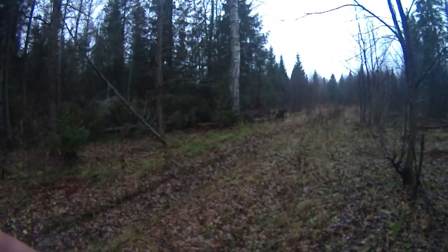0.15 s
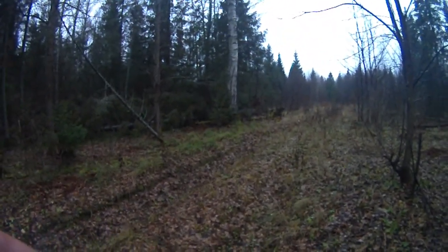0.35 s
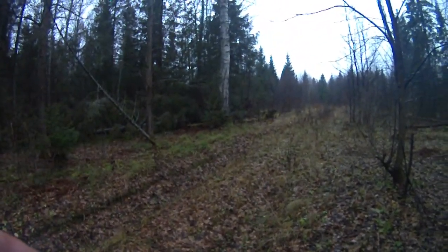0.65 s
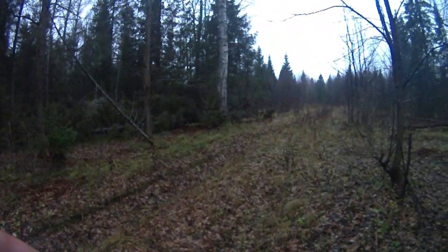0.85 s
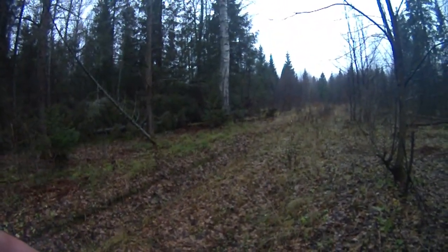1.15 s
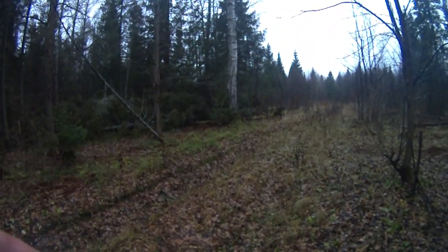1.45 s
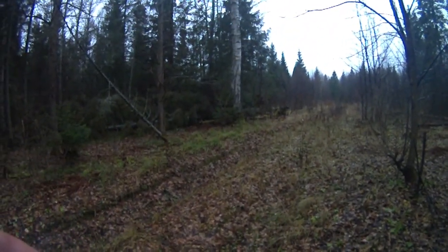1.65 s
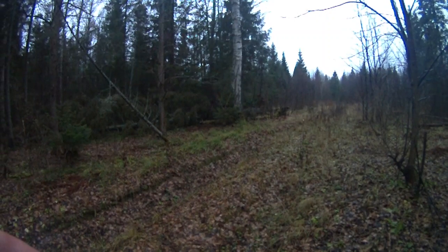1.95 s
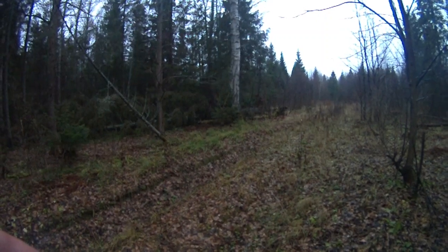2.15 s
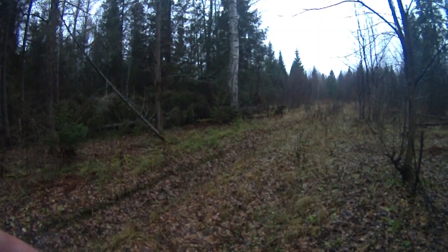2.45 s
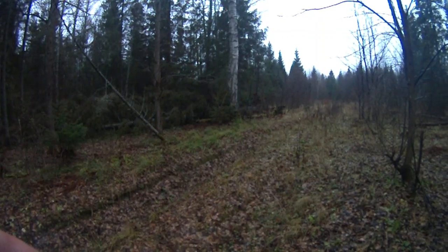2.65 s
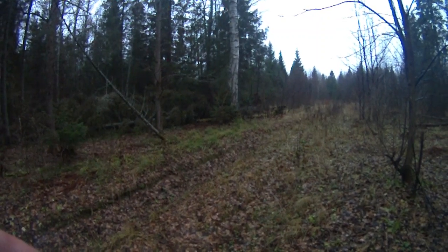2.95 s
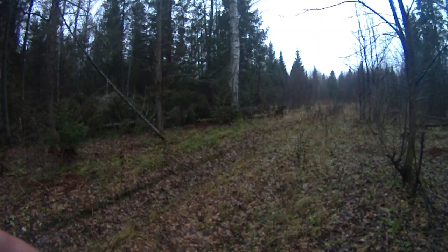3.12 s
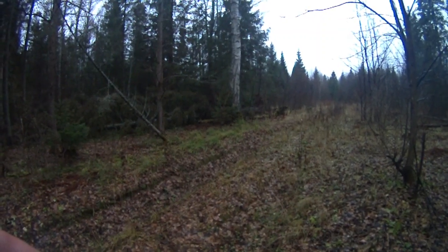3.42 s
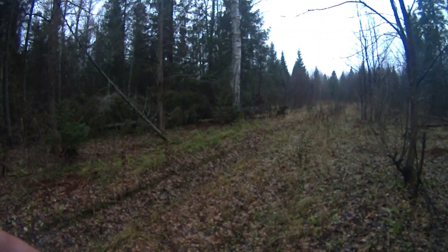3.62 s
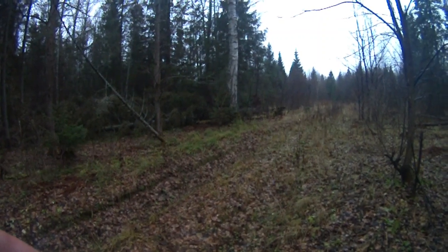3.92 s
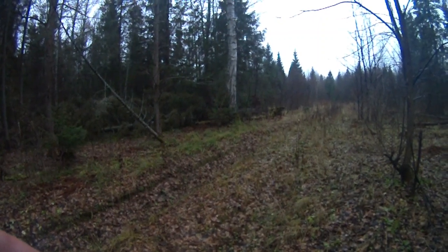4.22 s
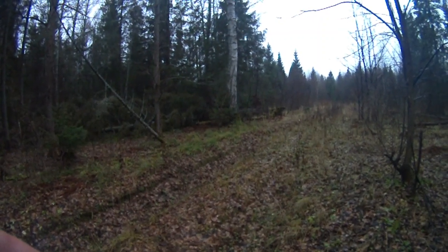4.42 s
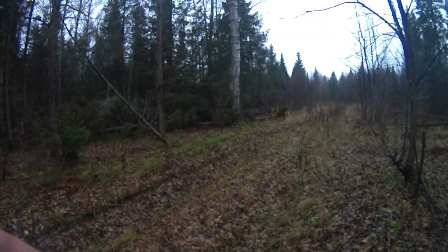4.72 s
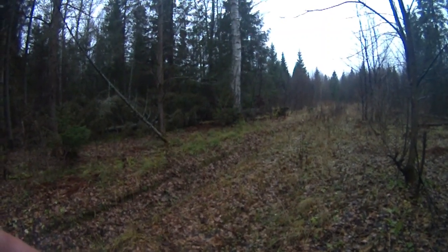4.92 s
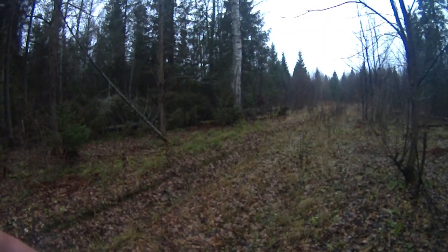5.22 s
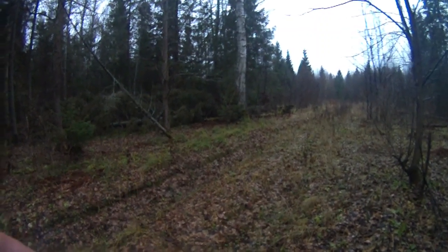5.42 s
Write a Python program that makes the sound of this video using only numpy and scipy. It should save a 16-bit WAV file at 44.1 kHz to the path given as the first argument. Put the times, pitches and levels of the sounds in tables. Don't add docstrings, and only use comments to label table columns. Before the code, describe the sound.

Far-off hoarse dog yelps ring through quiet woods with long blurred tails, then a sharp hard catch snaps shut right beside the microphone.

```python
import sys
import numpy as np
from scipy import signal
from scipy.io import wavfile

SR = 44100
rng = np.random.default_rng(int(sys.argv[2]) if len(sys.argv) > 2 else 0)


def transcribe(u):
    v = np.clip(np.atleast_2d(u).T, -1, 1)
    q = np.round(v * 32767).astype(np.int16)
    wavfile.write(sys.argv[1], SR, q)


def rack_gain(trim_db):
    fader = np.asarray(trim_db, float)
    return 10 ** (fader / 20)


N = 245725


def rms_one(x):
    return x / np.sqrt(np.mean(x ** 2) + 1e-20)


def at_hz(points, hz):
    point_hz, value = np.array(points).T
    return np.interp(np.log(hz), np.log(point_hz), value)


def drift(rate_hz, size):
    r = np.exp(-2 * np.pi * rate_hz / SR)
    wander = signal.lfilter([1], [1, -2 * r, r * r], rng.standard_normal(size + 4000))
    return rms_one(wander[4000:])


def peak(x, hz, width_hz):
    r = np.exp(-np.pi * width_hz / SR)
    poles = [1, -2 * r * np.cos(2 * np.pi * hz / SR), r * r]
    return signal.lfilter([(1 - r * r) / 2, 0, (r * r - 1) / 2], poles, x)


def ring(clicks, hz, t60):
    r = rack_gain(-60 / (t60 * SR))
    w = 2 * np.pi * hz / SR
    return signal.lfilter([0, np.sin(w)], [1, -2 * r * np.cos(w), r * r], clicks + 1e-18)


def swell(share, crest, start_db, end_db):
    crest = np.clip(crest, .02, .98)
    rise = -start_db * (1 - share / crest) ** 2
    fall = -end_db * ((share - crest) / (1 - crest)) ** 2
    return np.where(share < crest, rise, fall)


def hush():
    # f/Hz, density/dB per Hz
    colour = [(15, -61), (25, -34.5), (170, -15), (363, -3), (439, -10), (677, -1), (863, -19.5),
              (1040, -10.5), (1440, -14), (1840, -17.5), (2220, -17.5), (14800, -26), (17000, -27)]
    # f/Hz, correlation/1
    likeness = [(40, 0.99), (150, 1), (380, 0.99), (950, 0.99), (2380, 0.84), (5980, 0.55), (15000, 0.46)]
    level_db = -54.5
    out = 0
    edges = 20 * 2 ** np.arange(0, 10.5, .5)
    white = rng.standard_normal((2, 2, N))
    for k, (low, high) in enumerate(zip(edges, edges[1:])):
        band = signal.butter(2, [low, high], "band", fs=SR, output="sos")
        mid, side = signal.sosfilt(band, white[k % 2])
        hz = np.sqrt(low * high)
        alike = np.clip(at_hz(likeness, hz), 0, 1)
        stereo = np.sqrt(1 + alike) * mid + np.sqrt(1 - alike) * side * [[1], [-1]]
        out = out + rack_gain(at_hz(colour, hz)) * stereo
    return rack_gain(level_db) * rms_one(out)


def whistle():
    # f/Hz, width/Hz, level/dB
    whistle_band = (11145, 100, -83.5)
    hz, width_hz, db = whistle_band
    narrow = peak(peak(rng.standard_normal(N), hz, width_hz), hz, width_hz)
    return rack_gain(db + 5 * drift(14, size=N)) * rms_one(narrow)


def forest(x):
    # delay/s, smear/s, level/dB, cut/Hz
    echo = (0.28, 0.23, -1.5, 649)
    # level/dB, t60/s, cut/Hz, build-up/s
    tails = [(0, 0.21, 1240, 0.0056), (-2, 0.86, 1700, 0.031), (-2.5, 2.96, 1900, 0.029)]
    # f/Hz, width/Hz, level/dB
    scatter = [(317, 440, -7.5), (490, 127, -2), (784, 294, -1.5), (987, 354, 2.5), (1570, 610, 1)]
    t = np.arange(2 * SR) / SR
    delay, smear, db, cut_hz = echo
    cluster = rng.standard_normal(len(t)) * np.exp(-((t - delay) / smear) ** 2)
    cluster /= np.linalg.norm(cluster)
    reply = rack_gain(db) * signal.lfilter(*signal.butter(2, cut_hz, fs=SR), cluster)
    for db, t60, cut_hz, build in tails:
        tail = rng.standard_normal(len(t)) * rack_gain(-60 * t / t60) * (1 - np.exp(-t / build))
        tail /= np.linalg.norm(tail)
        reply += rack_gain(db) * signal.lfilter(*signal.butter(1, cut_hz, fs=SR), tail)
    coloured = sum((-1) ** k * rack_gain(db) * peak(reply, hz, w) for k, (hz, w, db) in enumerate(scatter))
    return signal.fftconvolve(x, coloured)[:N]


def twigs():
    # t/s, level/dB, f/Hz
    ticks = [
        (.625, -45, 6600),
        (0.634, -43, 7500),
    ]
    out = np.zeros(N)
    for s, db, hz in ticks:
        at = round(s * SR)
        out[at:at + 400] += rack_gain(db) * ring(signal.unit_impulse(400), hz, 0.0056)
    return out


def catch():
    # t/s, level/dB
    snaps = [
        (.022, -24.5),
        (5.4797, -31.5),
        (5.5051, -4),
    ]
    # share of the upper modes/dB, low cut/Hz, softness cut/Hz
    snap_colours = [(-35, 230, 680), (2, 860, 2100), (-2, 980, 7900)]
    # f/Hz, level/dB, t60/s
    modes = [(670, -39, 0.013), (1107, -2.5, 0.009), (1306, -6.5, 0.023), (1796, 1, 0.0097),
             (2210, -8.5, 0.027), (2495, -5.5, 0.021), (3040, -6, 0.0079), (3695, -11.5, 0.012),
             (4460, -14, 0.0051), (5400, -29, 0.012), (6000, -24.5, 0.0098), (7110, -26.5, 0.01),
             (9600, -29, 0.0068), (11300, -16, 0.0054), (13900, -22, 0.0058)]
    facing = [1, -1, 1, -1, 1, 1, -1, 1, 1, 1, -1, 1, -1, 1, -1]
    out = np.zeros(N)
    for (s, blow_db), (upper_db, low_hz, soft_hz) in zip(snaps, snap_colours):
        click = rack_gain(blow_db) * signal.unit_impulse(2000)
        click = signal.lfilter(*signal.butter(3, soft_hz, fs=SR), click)
        click = signal.sosfilt(signal.butter(4, low_hz, "high", fs=SR, output="sos"), click)
        at = round(s * SR)
        for way, (hz, db, t60) in zip(facing, modes):
            mode_db = db + upper_db * (hz > 1900)
            out[at:at + 2000] += way * rack_gain(mode_db) * ring(click, hz, t60)
    return out


def call(start, length, first_hz, last_hz, bend, sharp_hz, wobble):
    settle_s, fade_s = .017, 0.0032
    at = max(round(start * SR), 0)
    share = np.arange(min(round(length * SR), N - at)) / (length * SR)
    hz = first_hz + (last_hz - first_hz) * share ** bend
    hz = hz + sharp_hz * np.exp(-share * length / settle_s)
    unsteady = 1 + wobble * drift(80, size=SR // 2)[:len(hz)]
    phase = 2 * np.pi * np.cumsum(hz * unsteady) / SR
    fade = np.clip(np.minimum(share, 1 - share) * length / fade_s, 0, 1)
    return at, share, hz, phase, fade


def whines():
    # t/s, length/s, pitch/Hz, level/dB
    tones = [
        (4.51, .14, 635, -46),
        (5, 0.16, 880, -59),
        (1.1, 0.087, 215, -55.5),
    ]
    tone_swell = (0.17, 12, 7.2)
    out = np.zeros(N)
    for s, length, hz, db in tones:
        at, share, _, phase, fade = call(s, length, hz, hz, bend=1, sharp_hz=0, wobble=0.011)
        out[at:at + len(phase)] += fade * rack_gain(db + swell(share, *tone_swell)) * np.sin(phase)
    return out


def throat_breath(phase):
    # f/Hz, width/Hz, level/dB
    throat = [(500, 269, -0.5), (893, 462, -2.5), (1027, 704, -4.5), (1297, 700, -13)]
    puffs = rng.standard_normal(SR // 2)[:len(phase)] * (1 + 0.9 * np.cos(phase))
    breath = 0
    for k, (hz, width_hz, db) in enumerate(throat):
        breath = breath + (-1) ** k * rack_gain(db) * peak(peak(puffs, hz, width_hz), hz, width_hz)
    return rms_one(breath)


def yelps():
    # t/s, length/s, first pitch/Hz, last pitch/Hz, level/dB
    calls = [
        (0, .05, 490, 460, -49),
        (0.249, 0.1, 529, 371, -41.5),
        (0.726, 0.14, 535, 366.4, -42.5),
        (1.574, .14, 498, 345, -41.5),
        (2.119, 0.11, 490, 380, -43.5),
        (2.571, .13, 505, 425, -40),
        (3.36, 0.103, 525.7, 400, -48.5),
        (4.539, .25, 542, 553, -44),
        (5.039, 0.18, 525.3, 512, -51),
        (5.461, 0.12, 486.3, 458, -48.5),
    ]
    # overtones/dB, breath/dB, lateness of the fundamental's and the overtones' crests/share of the length
    yelp_colours = [(-0.5, 2.5, -0.18, 0.061), (2.5, 1, 0.042, 0.075), (2, -2, -.06, .06),
                    (2, 0, .12, 0.14), (5, 2, -.1, 0.073), (-2, -1, .22, -0.36), (1.5, 5, 0.16, 0.14),
                    (-4, -6.5, 0.01, -0.017), (-5.5, 4, .15, -0.068), (4, 3, 0.21, 0.056)]
    manners = ["howled", "held", "held", "slid", "slid", "slid", "held", "howled", "slid", "slid"]
    bends = {"held": 2.8, "slid": 2.4, "howled": .8}
    overshoot_hz = {"held": 5, "slid": 125, "howled": -8}
    wobbles = {"held": .017, "slid": .02, "howled": .011}
    swells = {"held": [(0.77, 63, 6, 2.5), (0.39, 22, 22, -2), (0.62, 20, 14, -14), (0.42, 9, 19, -1.5)],
              "slid": [(.33, 8, 22.5, 1), (0.7, 13.5, 11, -2), (0.79, 20, 10, -17), (0.35, 16, 17.5, 0)],
              "howled": [(0.1, 11, 29, -0.5), (0.046, 4, 28, 0.5), (0.29, 10, 16, -9), (0.52, 12, 9, -1.5)]}
    # f/Hz, gain/dB
    mouth = [(350, -3), (480, -0.3), (600, 0), (800, 3.5), (900, -7), (1020, 1.4), (1250, -5.5),
             (1800, 2.5)]
    voice, hoarseness = np.zeros(N), np.zeros(N)
    for yelp, colour, manner in zip(calls, yelp_colours, manners):
        s, length, first_hz, last_hz, db = yelp
        overtone_db, hoarse_db, late, late_overtones = colour
        at, share, hz, phase, fade = call(s, length, first_hz, last_hz, bends[manner],
                                          overshoot_hz[manner], wobbles[manner])
        here = slice(at, at + len(hz))
        levels = []
        lateness = (late, late_overtones, late_overtones, 0)
        for (crest, start_db, end_db, layer_db), delay in zip(swells[manner], lateness):
            swell_db = swell(share, crest + delay, start_db, end_db)
            levels.append(fade * rack_gain(db + layer_db + swell_db))
        *harmonics, hoarse = levels
        for k, level in enumerate(harmonics):
            shimmer = 1 + (.33 + .4 * k) * drift(70, size=SR // 2)[:len(hz)]
            colour_db = at_hz(mouth, (k + 1) * hz) + overtone_db * (k > 0) + 4 - 3.5 * k
            voice[here] += level * shimmer * np.sin((k + 1) * phase) * rack_gain(colour_db)
        hoarseness[here] += hoarse * rack_gain(hoarse_db) * throat_breath(phase)
    return voice, hoarseness


def scene():
    voice, hoarseness = yelps()
    voice = voice + whines()
    direct = voice + rack_gain(-4) * hoarseness
    swayed = voice * (.8 + .6 * drift(35, size=N))
    scattered = forest(swayed + rack_gain(3.5) * hoarseness)
    return direct + scattered + catch() + twigs() + whistle() + hush()


def roll_off(x):
    return signal.sosfilt(signal.butter(12, 15300, fs=SR, output="sos"), x)


def record(dry):
    ceiling = 1.1
    return roll_off(ceiling * np.tanh(dry / ceiling))


dry = scene()
out = record(dry)
transcribe(out)
```